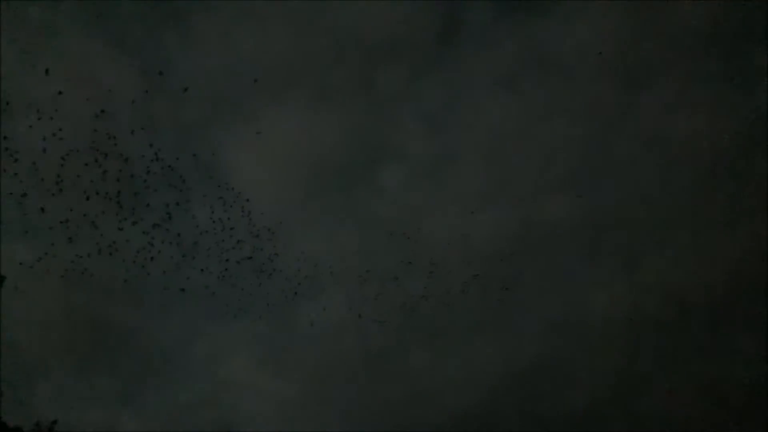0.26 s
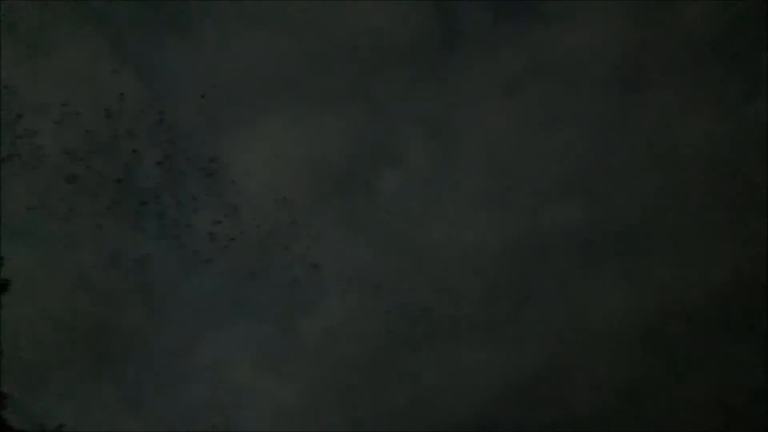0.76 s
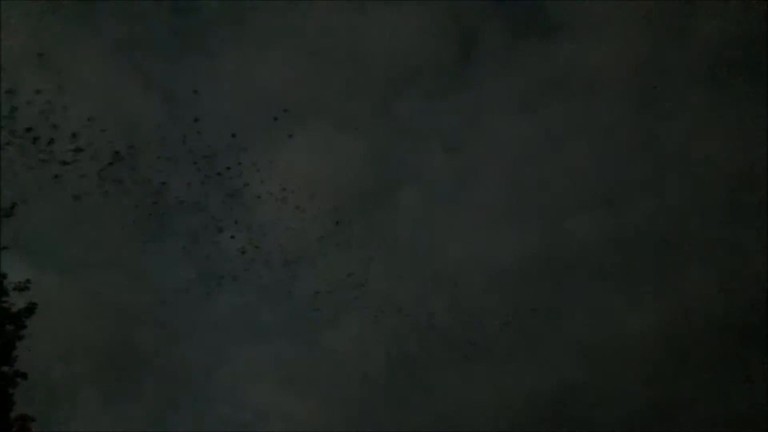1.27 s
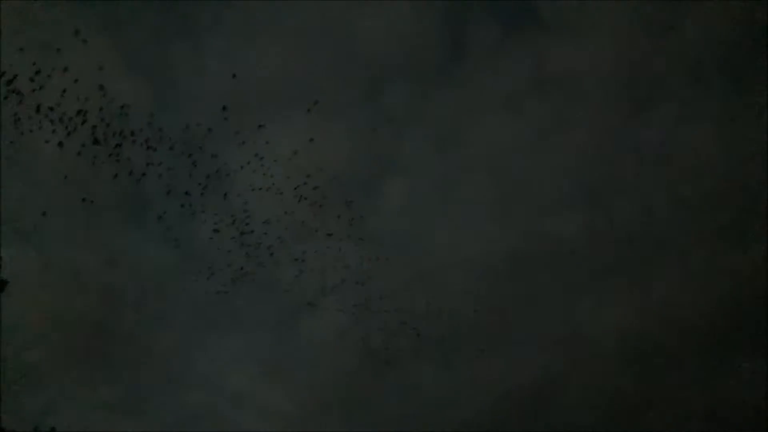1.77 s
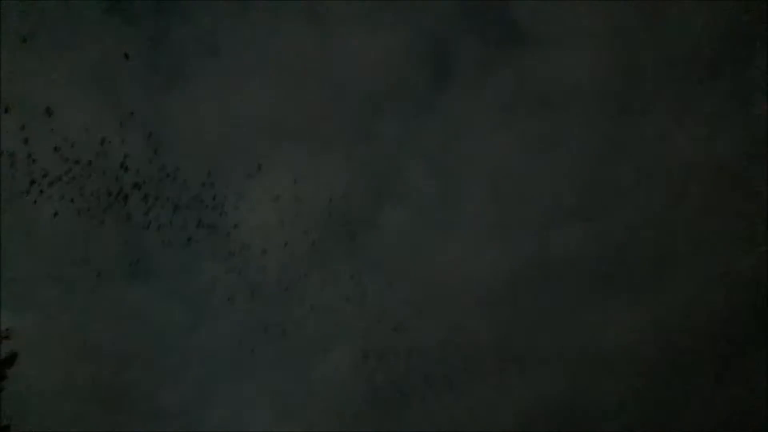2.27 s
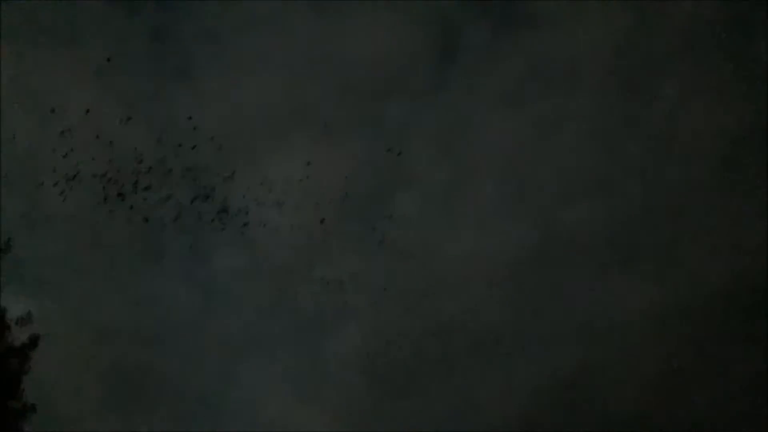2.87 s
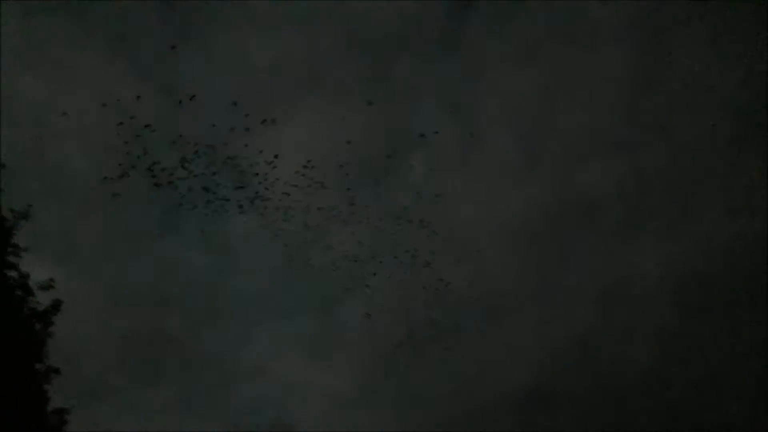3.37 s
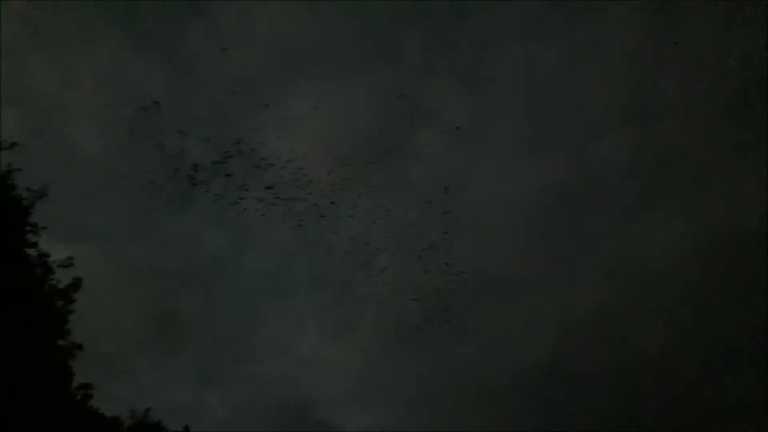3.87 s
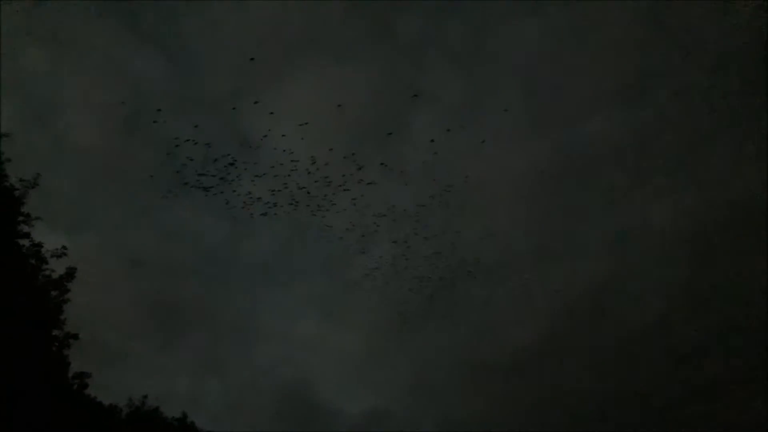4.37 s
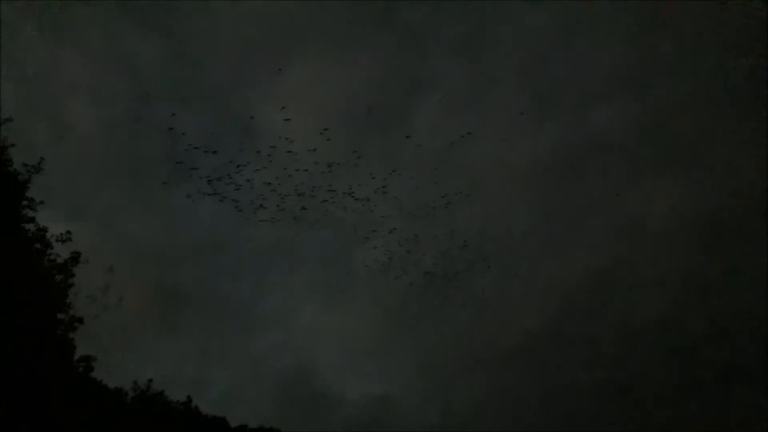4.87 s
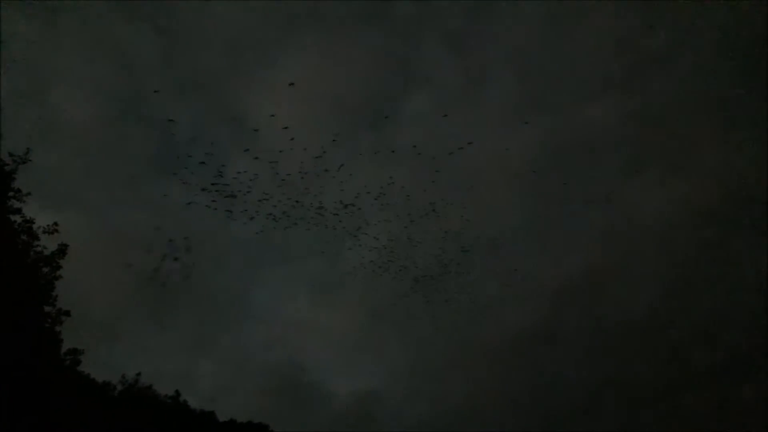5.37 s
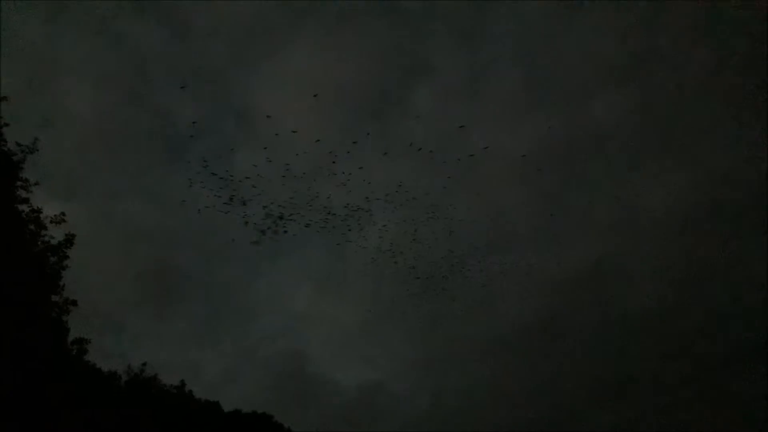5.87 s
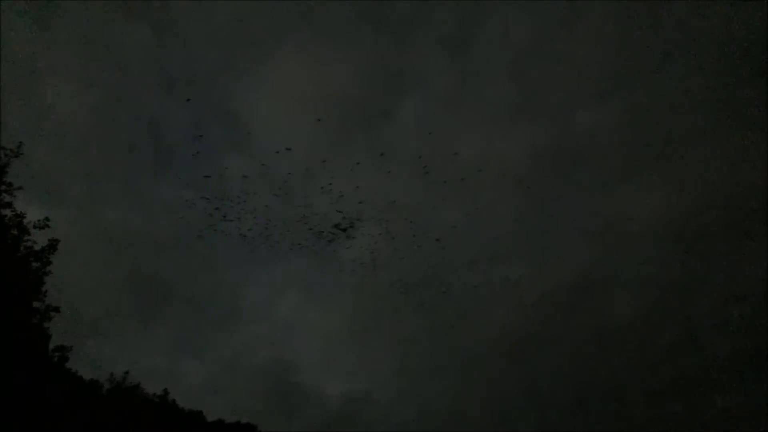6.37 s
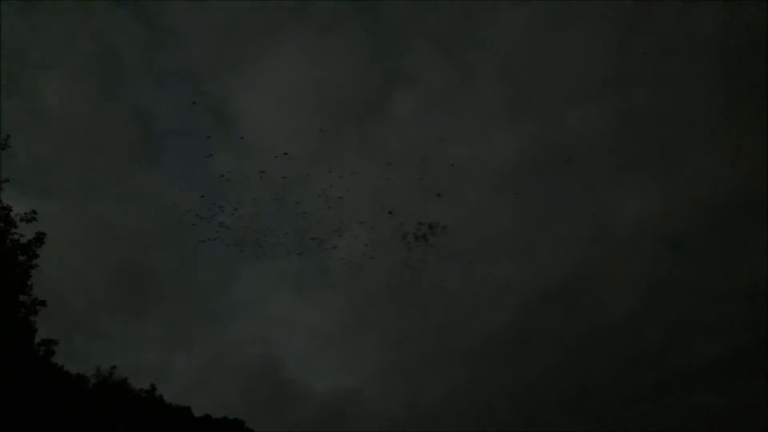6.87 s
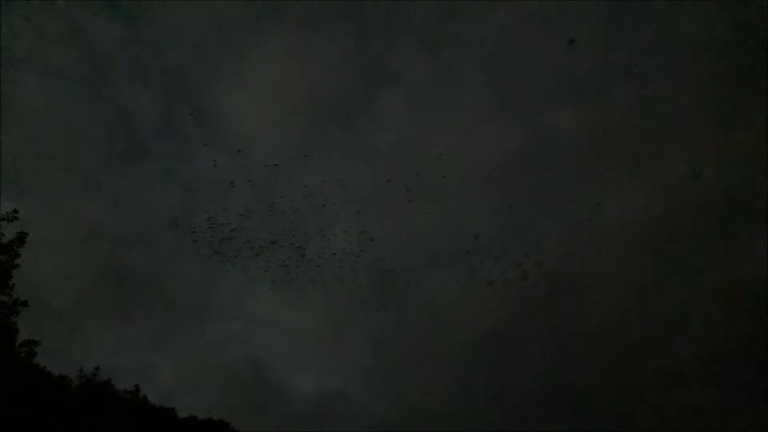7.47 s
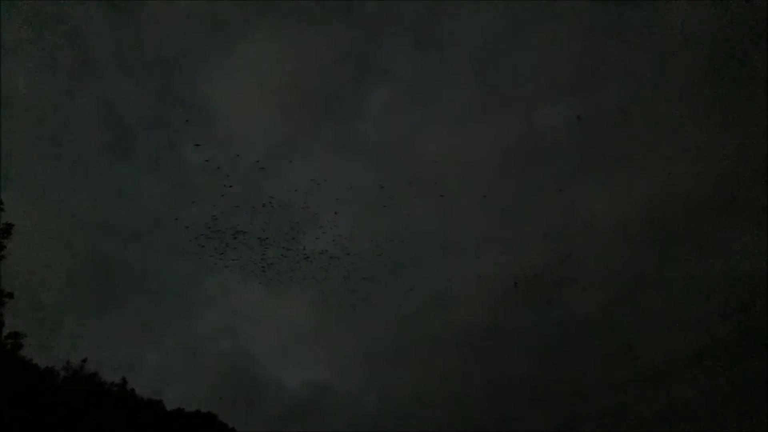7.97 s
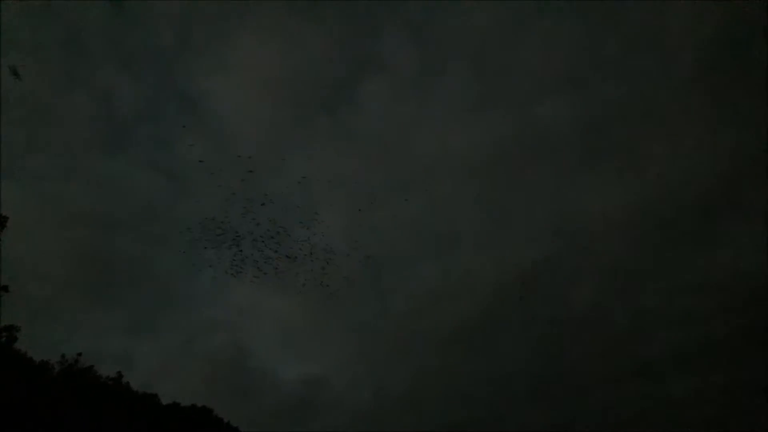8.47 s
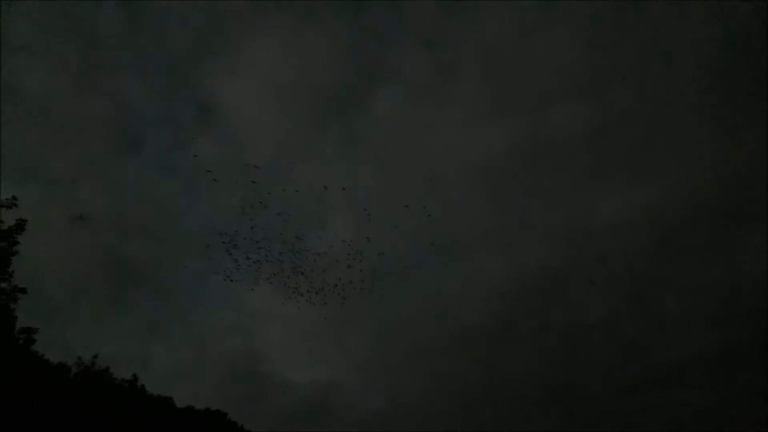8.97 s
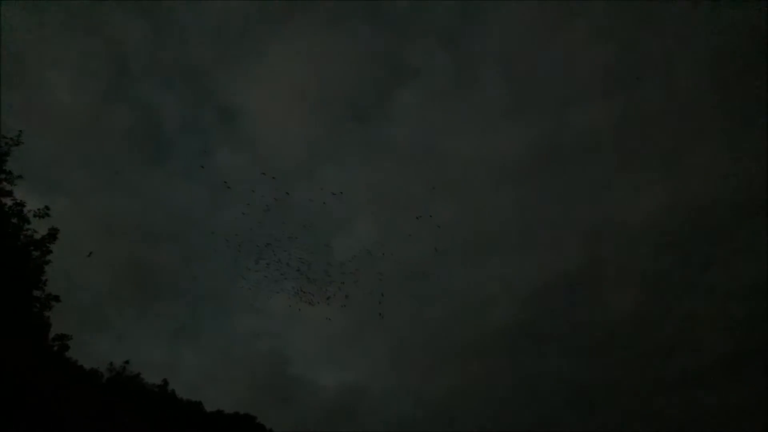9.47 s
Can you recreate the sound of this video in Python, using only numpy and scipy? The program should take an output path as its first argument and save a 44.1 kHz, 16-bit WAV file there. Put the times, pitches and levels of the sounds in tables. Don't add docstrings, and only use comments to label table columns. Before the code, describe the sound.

A big flock of jackdaws wheels in a dark cloudy sky over trees, already calling at the start. From 0 to 2 s many near calls overlap: clipped, raspy chacks dropping quickly in pitch, over a dense babble of hundreds of distant birds. The chatter crests near 1.9 s and again around 3.2 s, pulsing with brief lulls. Longer hoarse rook caws sound at about 2.1, 2.8, 4.3, 6.4, 7.35, 8.0 and 9.0 s, increasingly faint. After 4 s the birds recede; calls grow thinner, duller and sparser until the end near 9.7 s. Below is soft traffic and wind rumble. A far engine slows during the first 1.3 s; others rev faintly around 4-5 and 6-7 s, and one climbs from 7.3 s. A very faint fan hums steadily. Slight camera hiss remains, with a short handling rustle at 0.9 s and a softer one at 4.5 s.

```python
import sys
import numpy as np
from scipy import signal
from scipy.fft import rfft, irfft, next_fast_len
from scipy.io import wavfile
from scipy.ndimage import uniform_filter1d, map_coordinates

SR = 44100
rng = np.random.default_rng(int(sys.argv[2]) if len(sys.argv) > 2 else 0)


def invert_db(x):
    u = np.asarray(x, float) / 20
    return 10 ** u


def bounce(signal):
    frames = np.transpose(np.atleast_2d(signal))
    limited = np.clip(frames, -1, 1)
    pcm = np.round(limited * 32767).astype(np.int16)
    wavfile.write(sys.argv[1], SR, pcm)


N = 429534


def unit(x):
    return x / np.sqrt(np.mean(x ** 2) + 1e-20)


def curves(rows):
    s, *cols = np.transpose(rows)
    return [np.interp(np.arange(N) / SR, s, c) for c in cols]


def wobble(rate):
    knots = rng.standard_normal(int(N * rate / SR) + 4)
    return map_coordinates(knots, [np.arange(N) * rate / SR])


def coloured(x, spectrum):
    size = next_fast_len(N + 8192)
    hz, db = np.transpose(spectrum)
    log_hz = np.log(np.fft.rfftfreq(size, 1 / SR) + 1)
    gain = invert_db(np.interp(log_hz, np.log(hz), db))
    return unit(irfft(rfft(x, size) * gain, size)[:N])


def scattered(x, t60, wet_db):
    hop = SR // 8
    at = hop * np.arange(N // hop + 1)[:, None]
    pieces = np.pad(x, (hop, 2 * hop))[at + np.arange(2 * hop)] * np.hanning(2 * hop)
    fade = invert_db(-60 * np.arange(3 * hop) / SR / t60)
    tails = rng.standard_normal((len(at), 3 * hop)) * fade
    wet = signal.fftconvolve(pieces, tails / np.linalg.norm(tails[0]), axes=1)
    places = at + np.arange(wet.shape[1])
    echo = np.bincount(places.ravel(), wet.ravel())[hop:][:N]
    return x + invert_db(wet_db) * echo


def chacks(start, pitch_hz, fall, overtones_db, rough, length):
    t = np.arange(int(1.7 * length * SR)) / SR
    drop = np.clip(1 - fall[:, None] * t * (.35 + t / .055), .3, 1)
    pitch = pitch_hz[:, None] * drop
    jitter = uniform_filter1d(rng.standard_normal(pitch.shape), 24, axis=1) * np.sqrt(24)
    phase = (2 * np.pi * np.cumsum(pitch * (1 + rough * jitter), axis=1) / SR).astype(np.float32)
    rasp = invert_db(5 * uniform_filter1d(jitter, 90, axis=1))
    shape = rasp * (1 - np.exp(-t / 0.0077)) ** 2 / (1 + (t / length) ** 6)
    voice = 0
    for k, db in enumerate(overtones_db):
        voice = voice + invert_db(db)[:, None] * invert_db(-95 * k * t) * np.sin((k + 1) * phase)
    at = np.round(start * SR).astype(int)[:, None] + np.arange(len(t))
    return np.bincount(at.ravel(), (voice * shape).ravel(), N + SR)


# (time [s], start pitch [Hz], level of the second overtone [dB],
# brightness: # third overtone against it [dB])
SLOW_CALLS = [(.335, 1275, -35.5, -16), (.473, 1330, -33, -25), (.534, 1353, -38, -18),
              (.702, 1170, -37, -10), (.931, 1370, -40, -19), (1.285, 1430, -42, -19),
              (1.354, 1394, -39.5, -10), (1.483, 1167, -42, -12), (1.858, 1165, -33, -12),
              (1.897, 1317, -51, -23), (1.955, 1334, -32.5, -33), (2.211, 1137, -39.5, -2),
              (2.219, 1290, -41.5, -1), (2.393, 1177, -44, -6), (2.94, 1374, -43, -20),
              (3.314, 1370, -43, -15), (3.916, 1377, -43, -27), (4.546, 1150, -40, -8),
              (4.705, 1487, -41.5, -5.5), (4.965, 1300, -45, -11), (5.097, 1350, -55, 7),
              (5.222, 1350, -44, -10), (5.643, 1311, -41, -9), (5.94, 1392, -44, -11),
              (6.83, 1348, -45, -5.5), (7.364, 1350, -42, -13), (7.581, 1350, -45, -15),
              (7.796, 1310, -45.5, -8), (8.74, 1340, -41, -10), (8.893, 1320, -49, -9)]
FALLING_CALLS = [(.025, 1460, -36, -22), (.609, 1374, -35, -13), (.653, 1314, -41, -6),
                 (.675, 1494, -36.5, -9.5), (1.276, 1330, -39, -10), (1.665, 1170, -40.5, -11),
                 (2.095, 1330, -39, -6.5), (2.59, 1297, -47, 1), (2.705, 1307, -43, -6),
                 (2.867, 1146, -41.5, -2.5), (3.161, 1240, -42, -3.5), (3.261, 1316, -45.5, -2.5),
                 (3.529, 1330, -43, -14), (3.802, 1383, -37.5, -3), (3.979, 1337, -39, -13),
                 (4.448, 1202, -48, -2.5), (4.631, 1295, -67, 21), (4.737, 1233, -50, 6),
                 (4.744, 1398, -40.5, -4), (5.183, 1330, -49, -1), (5.476, 1440, -54, 1),
                 (5.571, 1444, -54, -2), (6.125, 1330, -53, 0), (6.7, 1203, -45, -19),
                 (7.084, 1346, -47, -12), (7.162, 1190, -43.5, -13), (7.312, 1374, -39, -8.5),
                 (8.509, 1460, -44, -23), (9.122, 1466, -46, -7), (.258, 1333, -42, -16),
                 (.298, 1420, -42, -16), (2.405, 1230, -43, -12), (8.155, 1470, -46, -16),
                 (8.328, 1370, -46, -11), (8.91, 1506, -48.5, -8), (9.592, 1370, -45.5, -4),
                 (9.722, 1320, -42, -8)]
STEEP_CALLS = [(.388, 1420, -56, -1), (.886, 1370, -41, -9), (.987, 1380, -38.5, -7.5),
               (1.386, 1465, -45, -12), (1.421, 1430, -41, -9), (1.781, 1423, -37, -12),
               (1.836, 1523, -38, -8), (1.879, 1324, -33, -5.5), (1.966, 1187, -37, -10),
               (3.017, 1460, -40, 3.5), (3.025, 1470, -42, -18), (3.048, 1183, -55, 4),
               (3.642, 1244, -38.5, -11), (3.774, 1300, -43, -5), (3.802, 1194, -36, -18),
               (4.061, 1352, -48, -1), (4.367, 1295, -42.5, -5), (4.586, 1200, -39, -5),
               (4.83, 1354, -41, -14), (5.428, 1437, -53, 8), (4.655, 1310, -51, 0), (9.15, 1370, -50, -1),
               (9.33, 1400, -53, -1), (6.418, 1372, -37.5, -14), (6.996, 1400, -46, -8),
               (7.034, 1353, -43.5, -10), (7.457, 1434, -43, -12), (7.651, 1402, -46.5, -20),
               (7.735, 1330, -43, -7), (8.016, 1265, -45, -1), (8.436, 1456, -47, -19),
               (8.698, 1248, -43.5, -5), (8.853, 1404, -36.5, -12)]
DRAWN_OUT_CALLS = [(1.612, 1265, -41, -10), (1.645, 1400, -46, -12), (2.357, 1375, -45, -18),
                   (6.293, 1420, -45, -11), (7.322, 1390, -46, -10)]
THIN_CALLS = [(4.165, 1335, -60, 12), (5.2, 1690, -56, 3), (5.11, 1404, -53, 2), (9.315, 1364, -52, 4),
              (9.505, 1467, -62, -3), (5.857, 1396, -55.5, 6), (3.722, 1298, -50, 0), (.52, 1200, -49, 1),
              (.548, 1414, -58, 1), (.825, 1160, -47, -6), (1.055, 1265, -49, -2), (3.185, 1386, -49, 1),
              (3.845, 1400, -50, 0), (4.452, 1280, -54, 2), (5.515, 1350, -56, 2), (5.752, 1347, -56, 2),
              (5.778, 1350, -65, 4), (6.35, 1350, -66, -2), (6.408, 1410, -66, -3), (6.46, 1338, -61, 6),
              (6.635, 1225, -66, 4), (6.72, 1306, -60, 3), (7.23, 1390, -58, 1), (7.465, 1390, -64, 5),
              (7.5, 1405, -48.5, -3), (8.235, 1470, -56, 1), (8.37, 1340, -59, 5), (8.475, 1316, -56, 5),
              (8.755, 1404, -60, 3), (9.04, 1336, -52, 0)]


def near_birds():
    # (calls, share of the pitch lost a second, length [s])
    kinds = [(SLOW_CALLS, 2.94, .037), (FALLING_CALLS, 5.3, .035), (STEEP_CALLS, 7.8, .027),
             (DRAWN_OUT_CALLS, 3.2, .068), (THIN_CALLS, 5.3, .03)]
    calls = 0
    for table, fall, length in kinds:
        s, pitch_hz, db, third = np.transpose(table)
        first_db = np.minimum(-51.5 - 0.12 * (db + 43.5), db + 6.5)
        fourth_db = db + third - 5 - 45 * np.clip(pitch_hz / 1350 - 1, 0, 1)
        fifth_db = fourth_db - 14.5 - 2.6 * s
        overtones_db = [first_db, db, db + third, fourth_db, fifth_db]
        falls = np.full(len(s), fall)
        calls = calls + chacks(s, pitch_hz, falls, overtones_db, .015, length)[:N]
    return invert_db(4) * scattered(calls, .3, wet_db=-6)


def steady(x):
    return unit(x / np.sqrt(uniform_filter1d(x ** 2, SR // 14) + .02))


# (time [s], level [dB], upper overtones against it [dB])
FLOCK_LEVEL = [(0, -39.5, -10), (.6, -40, -11.5), (1.3, -40, -11.5), (1.75, -41.5, -10.5),
               (1.95, -36, -11.5), (2.2, -39.5, -12.5), (2.7, -42, -13.5), (3.2, -37, -12.5),
               (3.85, -39.5, -13), (4.4, -42, -10), (5.2, -40.5, -12), (6, -42, -13), (6.6, -45, -11.5),
               (7.4, -45.5, -10), (8.1, -43.5, -12.5), (8.8, -45, -8.5), (9.3, -44.5, -10),
               (9.74, -50, -7.5)]
# (time [s], width [s], depth [dB], depth of upper overtones [dB])
QUIET_MOMENTS = [(.21, 0.12, 9, 5), (.46, .05, -0.5, 3), (.81, 0.14, 6.5, 5), (1.14, 0.087, 7, 9.5),
                 (1.602, 0.099, 2, 3), (1.76, 0.043, 6, 11), (2.069, 0.068, 5.5, 11), (2.55, 0.1, 3, -0.5),
                 (3.005, .03, 7, 12), (3.14, 0.065, 10.5, 12), (3.261, 0.063, 11, 8), (3.47, 0.1, 10, 8),
                 (3.72, 0.14, 12, 7), (3.94, 0.073, 7, 3), (4.14, 0.049, 6, 10), (4.92, 0.046, 1, 3),
                 (5.07, 0.036, 6, 4), (5.32, 0.11, 9, 5), (5.73, 0.11, 8.5, 7), (6.06, 0.08, 8, 7),
                 (6.28, 0.14, 4.5, 9.5), (6.79, 0.075, 3.5, 6), (6.97, 0.18, 4.5, 3.5), (7.28, 0.059, 4, 6),
                 (7.97, 0.15, 3, 0), (8.31, 0.19, 7.5, 4), (8.68, 0.086, 4.5, 8), (8.83, 0.041, 7.5, 3),
                 (8.99, 0.042, 5, 6), (9.45, 0.11, 2.5, 4)]


def flock_levels():
    level_db, upper_db = curves(FLOCK_LEVEL)
    s, width, low_db, high_db = np.transpose(QUIET_MOMENTS)
    t = np.arange(0, N + 64, 64) / SR
    dips = np.exp(-np.log(16) * ((t[:, None] - s) / width) ** 2)
    low = np.interp(np.arange(N) / SR, t, dips @ low_db)
    high = np.interp(np.arange(N) / SR, t, dips @ high_db)
    return level_db - low, upper_db + low - high


# (time [s], length [s], level [dB])
BRIGHT_MOMENTS = [(0.009, 0.13, -66), (0.29, 0.19, -72), (0.478, 0.2, -74), (0.645, 0.2, -69),
                  (0.887, 0.188, -67.5), (1.298, 0.13, -69), (1.608, 0.17, -76), (1.796, 0.28, -69.5),
                  (2.083, 0.39, -75), (2.858, 0.23, -68.5), (3.268, 0.13, -71), (3.775, 0.11, -66),
                  (4.15, 0.069, -65), (4.444, 0.08, -68), (4.726, 0.074, -76), (4.834, 0.069, -73),
                  (5.23, 0.057, -71)]


def top_gain():
    edge_s, linger_s = 0.063, 0.065
    t = np.arange(N) / SR
    gain = invert_db(-97.5)
    for s, length, db in BRIGHT_MOMENTS:
        rise = np.clip((t - s) / edge_s + .5, 0, 1) ** 2
        fade = np.exp(-np.clip(t - s - length + linger_s, 0, None) / linger_s)
        gain = gain + invert_db(db) * rise * fade
    return gain


# (pitch [Hz], level per Hz [dB])
THROAT_TONE = [(500, -45), (800, -12.5), (1000, -14), (1300, -6), (1600, 0.5), (2000, -3), (2300, 0),
               (2600, -2.5), (2900, -27), (3300, -20.5), (4200, -34.5), (7000, -120)]
BEAK_TONE = [(1650, -28), (2800, 0.5), (3050, -4.5), (3970, -4.5), (4500, -2.5), (5200, -8.5), (5600, -21),
             (7000, -45), (9100, -73), (15400, -120)]


def far_birds(count=1200):
    gap, pitch, fall = rng.random((count, 3)).T
    sizes_db = 3 * rng.standard_normal((count, 6)).T + 3 * np.arange(6)[:, None]
    start = (np.arange(count) + 3 * gap) / count * (N / SR + .2)
    pitch_hz = 1000 + 750 * pitch ** 1.3
    calls = chacks(start, pitch_hz, 1.5 + 9 * fall, sizes_db, rough=.022, length=.03)
    babble = scattered(calls[SR // 10:][:N], .4, wet_db=-.5)
    level_db, upper_db = flock_levels()
    top_tone = [(4900, -33), (5450, -6), (6000, -3.0), (6950, -13), (7100, -13.5), (8200, -32)]
    top = invert_db(-1.5) * top_gain() * steady(coloured(babble, top_tone))
    lower = steady(coloured(babble, THROAT_TONE))
    upper = steady(coloured(babble, BEAK_TONE))
    return invert_db(level_db - 1.5) * (lower + invert_db(upper_db) * upper) + top


def glide(rows, fade):
    hz, *db = curves(rows)
    t = np.arange(N) / SR
    gate = np.clip(np.minimum(t - rows[0][0] + fade, rows[-1][0] + fade - t) / fade, 0, 1)
    return 2 * np.pi * np.cumsum(hz) / SR, db, gate


# (time [s], length [s], start pitch [Hz], end pitch [Hz], level [dB])
ROOK_CAWS = [ (2.11, .27, 339, 296, -42.5), (2.84, .27, 336, 298, -44), (4.279, 0.24, 323, 306.2, -47),
             (6.421, 0.24, 318.6, 313.5, -49.5), (7.35, 0.25, 329.4, 312, -54), (8.04, .2, 330.7, 309, -56),
             (9.041, 0.28, 341, 323.5, -55)]
# (pitch [Hz], level [dB])
ROOK_THROAT = [(600, -13.5), (800, -25), (1000, -10), (1230, -3.5), (1340, 2), (1500, 3), (1700, 2.5),
               (1950, -4.5), (2400, -34)]


def rook():
    out = np.zeros(N)
    throat_hz, throat_db = np.transpose(ROOK_THROAT)
    for s, length, start_hz, end_hz, db in ROOK_CAWS:
        hoarse = .3 if db > -44.5 else .75
        rows = [(s, start_hz, start_hz), (s + 0.4 * length, start_hz, start_hz), (s + length, end_hz, end_hz)]
        phase, (hz,), gate = glide(rows, fade=0.024)
        on = gate > 0
        phase = (phase + hoarse * wobble(120))[on]
        voice = 0
        for k in range(2, 8):
            voice = voice + invert_db(np.interp(k * hz[on], throat_hz, throat_db)) * np.sin(k * phase)
        out[on] += (gate * invert_db(db + 2.2 * wobble(110)))[on] * voice
    return scattered(out, .25, wet_db=-9)


# (time [s], firing rate [Hz], first order level [dB], second order level [dB])
FAR_ENGINES = [
    [(0, 93.7, -49.5, -72), (.2, 87, -64, -82), (.45, 86.7, -57.5, -88), (.8, 83.5, -53, -73),
     (.92, 80.4, -62, -83), (1.03, 78.3, -48.5, -75), (1.25, 76.2, -46.5, -72), (1.33, 76.8, -73, -66)],
    [(3.9, 80.9, -65, -82), (4.4, 85.5, -61.5, -79), (4.95, 85.5, -64, -92)],
    [(5.85, 70, -69, -71), (6.07, 79.4, -52, -74), (6.24, 84, -64, -64), (6.4, 86.4, -58, -68),
     (6.8, 79.9, -61, -70), (7, 74.3, -62, -70)],
    [(7.3, 56.6, -68, -67), (7.7, 59.8, -67, -62), (8.5, 68, -67, -72), (8.65, 71.2, -60, -59),
     (9.08, 76.1, -55, -59), (9.2, 77.3, -58, -79), (9.3, 76.5, -49.5, -70), (9.48, 78.8, -62, -57),
     (9.74, 79.8, -56, -65)],
    [(5.1, 118.9, -63.5, -76), (5.6, 120, -65, -68.5), (6.15, 121.4, -69, -66)],
]


def engines():
    out = np.zeros(N)
    for rows in FAR_ENGINES:
        phase, (first, second), gate = glide(rows, fade=0.092)
        out += gate * np.sqrt(2) * (invert_db(first) * np.sin(phase) + invert_db(second) * np.sin(2 * phase))
    return out


# (pitch [Hz], level [dB])
FAN_TONES = [(463, -84.5), (487, -68), (511.5, -70.5), (536, -72), (560, -77)]


def fan():
    t = np.arange(N) / SR
    drift = .6 * wobble(2)
    out = 0
    for hz, db in FAN_TONES:
        out = out + invert_db(db + 4.5 + .8 * wobble(5.4)) * np.sin(2 * np.pi * hz * t + drift)
    return out


# (pitch [Hz], level per Hz [dB])
TOWN_TONE = [(15, -42), (25, -6.5), (87, 1), (253, -6.5), (422, -5), (493, -4.5), (615, -9.5), (730, -9.5),
             (882, -11.5), (1240, -0.5), (1500, -4.5), (1950, 1), (3300, -120)]


def town():
    gust_db = 5 * np.exp(-np.arange(N) / SR / 0.091)
    level_db = -50.5 + gust_db + 0.46 * wobble(2.94)
    return invert_db(level_db) * coloured(rng.standard_normal(N), TOWN_TONE)


def scene():
    return (near_birds() + far_birds() + rook() + engines() + fan() + town())[None]


def top_cut(x):
    return signal.sosfilt(signal.butter(12, 16690, fs=SR, output="sos"), x)


# (pitch [Hz], level per Hz [dB])
HISS_TONE = [(3820, -33.5), (5500, -3.5), (7270, -3), (9570, -4), (15100, 5.5), (15800, -5.5)]
# (time [s], spread [s], level over the hiss [dB])
HAND_RUSTLES = [
    (.893, 0.018, 7),
    (4.53, 0.13, -1),
]


def record(dry):
    t = np.arange(N) / SR
    rustle = sum(invert_db(db) * np.exp(-.5 * ((t - s) / spread) ** 2) for s, spread, db in HAND_RUSTLES)
    rustle_tone = [(10000, -25), (12000, -12), (14000, -1), (15500, -16)]
    hiss = coloured(rng.standard_normal(N), HISS_TONE)
    hiss += rustle * coloured(rng.standard_normal(N), rustle_tone)
    hz = np.fft.rfftfreq(N, 1 / SR)
    kept = (hz < 15800) / np.sqrt(1 + (46 / (hz + 1)) ** 8)
    mix = irfft(rfft(dry + invert_db(-78.0) * hiss) * kept, N)
    return top_cut(mix)


dry = scene()
out = record(dry)
bounce(out)
```